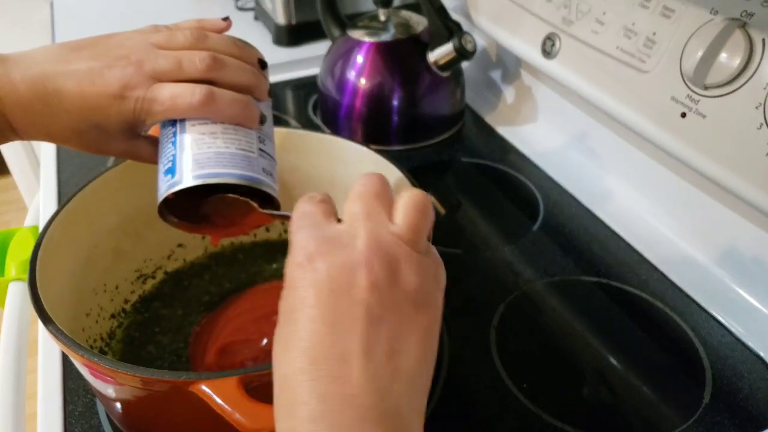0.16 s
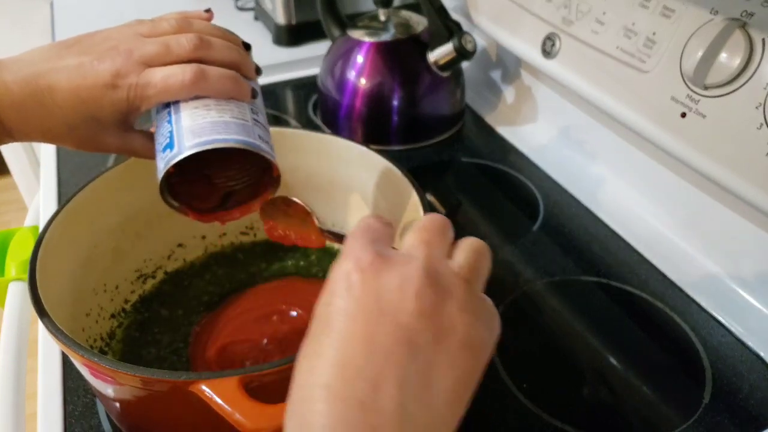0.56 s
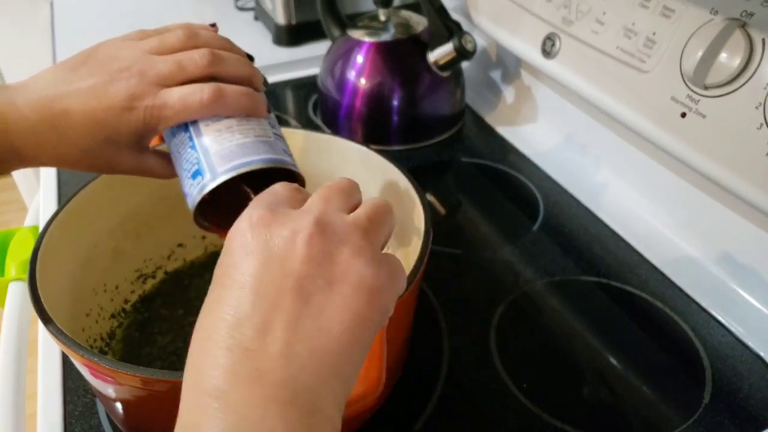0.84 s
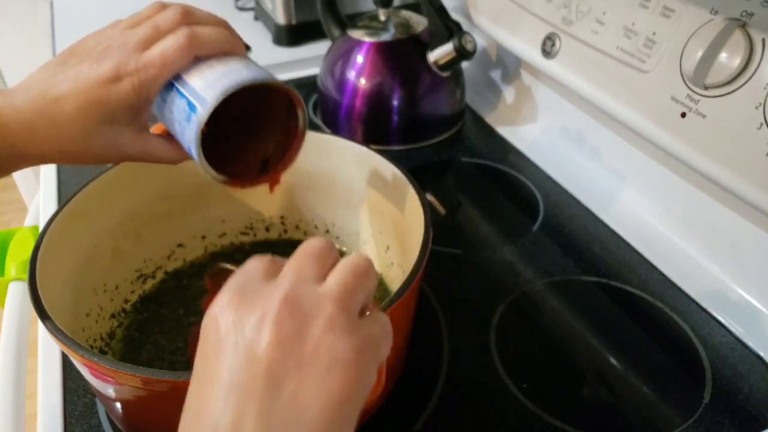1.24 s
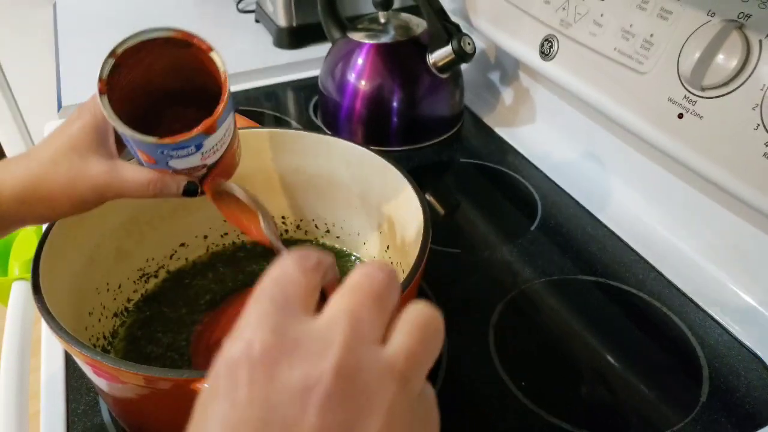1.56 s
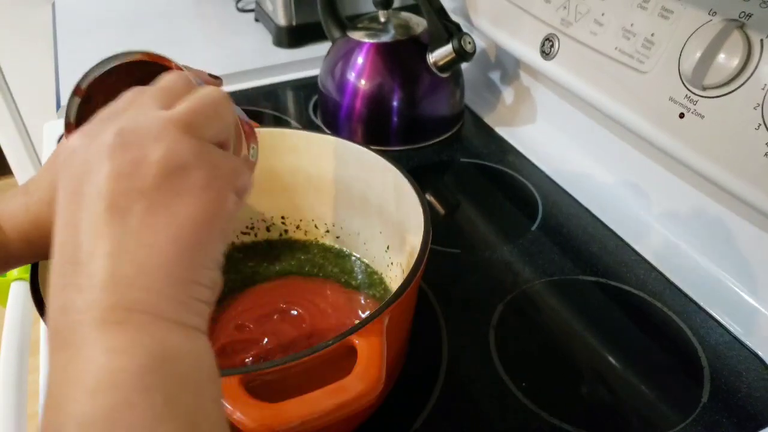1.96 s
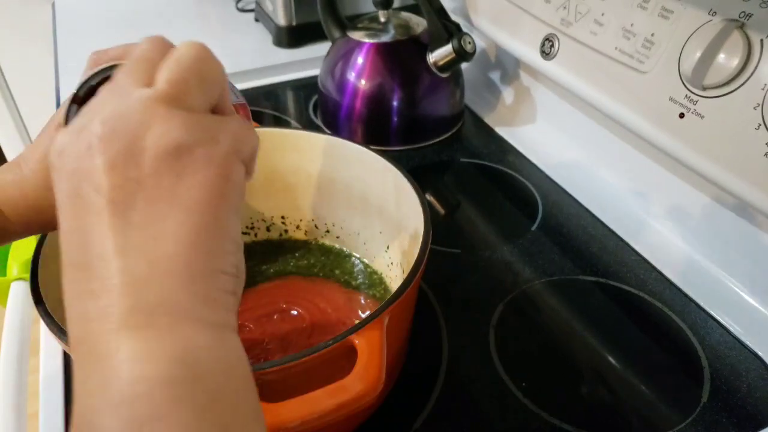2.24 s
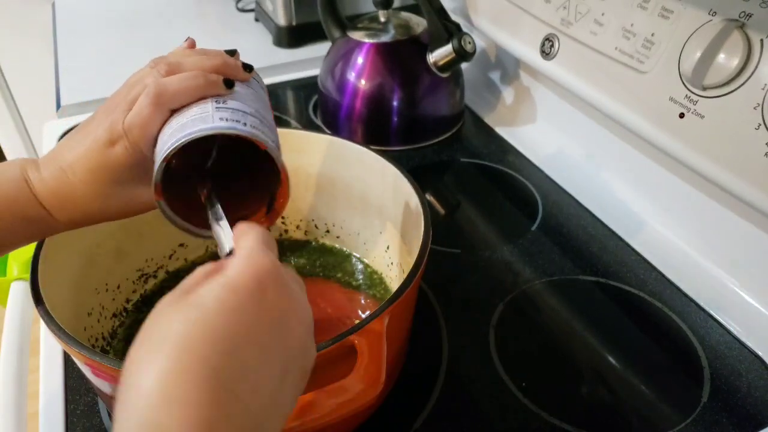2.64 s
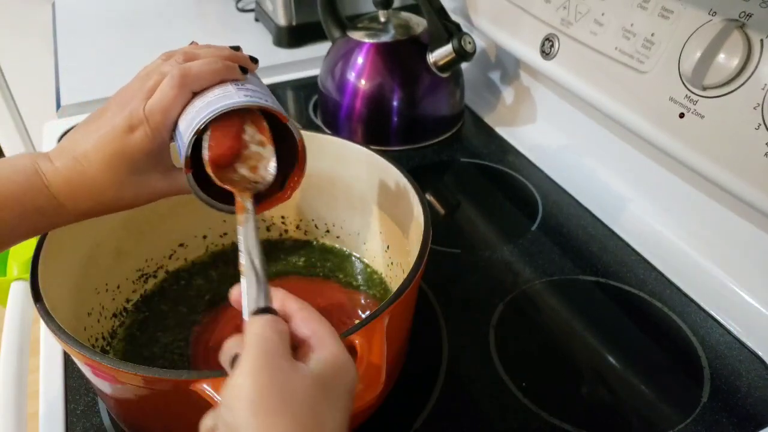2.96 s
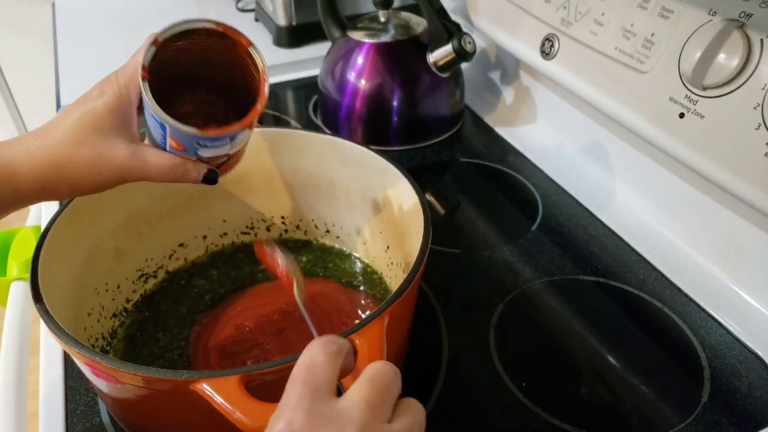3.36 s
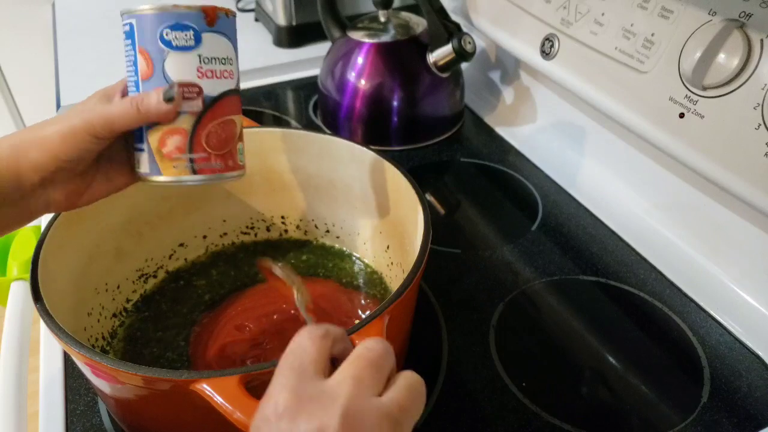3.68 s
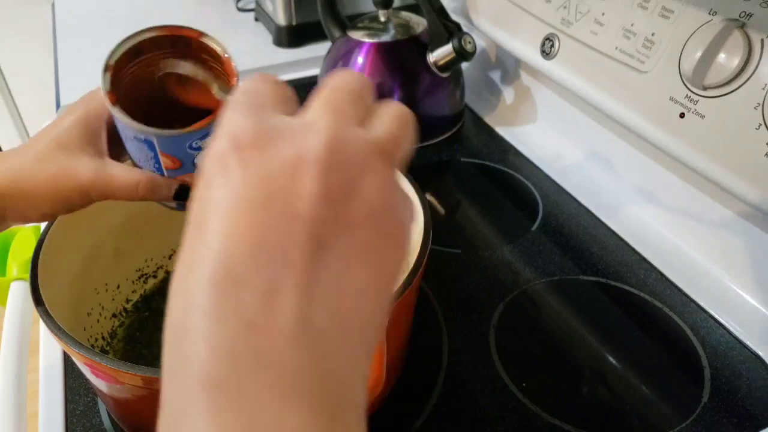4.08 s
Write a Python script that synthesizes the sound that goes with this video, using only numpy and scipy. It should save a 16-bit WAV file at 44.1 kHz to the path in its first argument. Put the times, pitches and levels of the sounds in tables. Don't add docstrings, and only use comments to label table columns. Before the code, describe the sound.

Over a quiet appliance hum and faint pot sizzle, a spoon taps a thin, hand-damped can, pauses, scrapes again, then clatters in a dense run of drags and sharp clacks. After a brief lull, two strong knocks on a cast-iron pot ring clear and bright with a low stove thud, followed by a tinny can strike. Close stereo microphones, small kitchen with a short reverberation.

```python
import sys
import numpy as np
from scipy import signal
from scipy.fft import rfft, irfft, next_fast_len
from scipy.io import wavfile
from scipy.ndimage import uniform_filter1d, map_coordinates

SR = 44100
rng = np.random.default_rng(int(sys.argv[2]) if len(sys.argv) > 2 else 0)


def undo_db(level):
    steps = np.asarray(level, float) / 20
    return 10 ** steps


def transcribe(u):
    v = np.clip(np.atleast_2d(u).T, -1, 1)
    q = np.round(v * 32767).astype(np.int16)
    wavfile.write(sys.argv[1], SR, q)


N = 185726

# [pitch_hz, likeness]
PORT_LIKENESS = [(60, 1), (200, 0.68), (600, 0.87), (1400, 0), (3000, 0), (15000, 0.063)]
# [pitch_hz, t60_s]
KITCHEN_DECAY = [(200, 0.33), (2000, 0.44), (6000, 0.23), (14000, 0.15)]
# [pitch_hz, level_db]
MIC_EDGE = [(15750, 0), (15950, -70)]

# [pitch_hz, density_db_per_hz]
HUM_COLOUR = [(13, -52), (22, -104), (43, 4), (107, -11.5), (141, -8.5), (271, -18), (349, -6.5),
              (390, -11), (459, 1.5), (685, -18), (836, -22), (950, -2), (1120, -44), (1470, -15),
              (1700, -50), (2210, -56), (3740, -120)]
# [pitch_hz, width_hz, level_db]
HUM_TONES = [(60.6, 1.5, 8), (99.9, 3.2, 5.5), (453, 81, -8), (959, 67, -9.5)]
# [pitch_hz, density_db_per_hz]
HISS_COLOUR = [(710, -16), (1200, -63), (1470, -1.5), (1930, -7.5), (2470, -1.5), (3100, -5.5),
               (4980, -5.5), (12200, -10), (15800, -9)]
HUM_DB, HISS_DB = -53.5, -60.5

# [start_s, length_s, wall_db, hollow_over_wall_db, rasp_over_wall_db]
DRAGS = [(.005, 0.03, -50.5, 7, -20), (0.178, .09, -65.5, 4, -12), (0.681, 0.17, -42, -9, -34),
         (0.757, 0.045, -49, -13, -34), (0.793, 0.053, -43, -11, -7.5), (1.002, 0.05, -60.5, 13, -4),
         (1.288, 0.18, -58, -20, -7), (1.953, 0.077, -39, 7, -5), (1.996, 0.041, -37, -4, -7),
         (2.054, 0.11, -43.5, -19, -7.5), (2.155, 0.057, -39, 3.5, -10.5), (2.238, 0.027, -55, 14, -12),
         (2.335, 0.047, -44, 5, -20), (2.385, 0.031, -43, 5, -10), (2.398, 0.035, -58.5, 25, -9),
         (2.453, 0.12, -49.5, 9, -7), (2.575, 0.055, -49, -11, -12), (2.682, 0.091, -45, 9, -5),
         (2.805, 0.16, -62, 21, 1), (2.942, 0.21, -54.5, 5, 0.5)]
# [start_s, length_s, wall_db, hollow_over_wall_db, rasp_over_wall_db]
SWEEPS = [(0.244, 0.028, -62.5, 24.5, 3), (0.363, 0.063, -49.5, 13, 2.5), (0.762, 0.11, -43, 8.5, -6),
          (1.001, 0.046, -56, 20, 6), (1.185, 0.043, -36, 6, -16), (2.632, 0.021, -52, 9, -0.5),
          (2.981, 0.066, -49, 17, -15), (3.042, 0.058, -43.5, 10, 2.5)]
LAND_S, SAG_DB_PER_S, SWELL_DB, LIFT_DB_PER_S = 0.0028, 77, 15.5, 612
HOLLOW_SAG = 0.36
# [start_s, most_excited_pitch_hz]
CONTACT = [(0, 2620), (.3, 3430), (.69, 3630), (.85, 4040), (1.05, 3050), (1.3, 3100), (1.95, 3640),
           (2.17, 3100), (2.42, 2850), (2.455, 1810), (2.54, 1900), (2.6, 2700), (2.69, 5050), (2.77, 4900),
           (2.82, 2940), (3.1, 3700)]
# [start_s, end_s, hollow_pitch_ratio, wall_db]
GRIPS = [
    (0, 1.7, 0.97, -10),
    (1.7, 2.62, 1.0, -7.5),
    (2.619, 3.4, 0.995, 1.5),
]
# [pitch_hz, width_hz, level_db]
GRIP_WALLS = [
    [(1873, 90, 8.5), (2320, 42, 6), (3000, 110, 4.5), (3624, 146, 4.5), (3970, 20, -11), (4280, 71, -9),
     (4660, 22, -16), (4900, 196, -1), (5500, 80, -3), (5930, 75, -21), (7050, 110, -9)],
    [(1840, 190, 2), (2230, 37, 5), (2443, 40, 1), (2830, 105, 0), (3100, 38, -20), (3420, 38, -5),
     (4430, 79, 6.5), (4640, 19, 5), (4600, 84, -5), (5000, 98, -9), (5900, 160, -19), (6290, 69, -16)],
    [(1976, 39, -1.5), (2330, 14, 6), (2340, 30, -8), (2850, 55, -9.5), (3450, 22, -21), (3900, 29, 2),
     (4200, 36, -2), (4530, 45, -8), (4670, 79, -4), (5250, 260, -12), (5700, 190, -28), (6850, 51, -8)],
]
# [pitch_hz, width_hz, level_db]
STROKE_HOLLOW = [(300, 60, -20), (475, 50, -18), (652, 28, 2), (1140, 60, -11), (1435, 40, -13)]
# [pitch_hz, width_hz, level_db]
HOLLOW_OVERTONE = [(1143, 48, -11)]
# [pitch_hz, density_db_per_hz]
SHELL_COLOUR = [(150, -53), (300, 9.5), (700, -16), (1300, -61), (2000, 2.5), (4300, 8), (6500, -11.5),
                (9000, -10)]
# [pitch_hz, density_db_per_hz]
RASP_COLOUR = [(2940, -20), (5000, 17.5), (5530, 11), (7070, 17.5), (8370, 14), (10300, 15.5), (12500, 22),
               (14500, 8), (15800, 18.5)]

# [start_s, peak_db, thump_over_peak_db, crack_over_peak_db]
STRIKES = [(0.682, -33, -1.5, 2.5), (1.152, -32, -6, -5), (2.0354, -17.5, -9.5, -1.5),
           (2.113, -24.5, -6.5, -10.5), (2.549, -30, -13, 1), (4.1853, -18, -5.5, -5.5),
           (0.0803, -22.5, -6, -6), (0.1312, -34, 3.5, -12.5), (0.1706, -31, -2, -23),
                 (2.3385, -32, -11.5, -11.5), (2.409, -34, -8, 1.5), (2.448, -32.5, -13, -5)]
# [pitch_hz, level_db, t60_s]
STRIKE_SPOTS = [
    [(670, -4, 0.1), (1117, 3, 0.052), (1818, -11, 0.3), (2930, -0.5, 0.074), (3100, -1, 0.068),
     (3630, 10.5, 0.05), (4160, 6, 0.04), (4550, -6, .018), (5238, -13, 0.08)],
    [(674.5, 2.5, 0.11), (1010, -8, 0.048), (1840, -8, 0.08), (2190, -7, 0.069), (2980, -9.5, 0.2),
     (3180, 4.5, 0.026), (3580, -11, 0.072), (4000, -10, 0.069), (4700, -16, .1)],
    [(456, -3.5, 0.039), (1214, 2.5, 0.061), (2213, -5, 0.1), (2263, -5, 0.082), (2430, -4.5, 0.069),
     (2960, -32, .1), (4400, 1, 0.024), (4610, 8, 0.019), (4670, -20, 0.14), (6100, -25, 0.042),
     (6990, -4.5, 0.029)],
    [(648, -1.5, 0.12), (1210, -14, 0.052), (1853, -0.5, 0.054), (3000, -20, 0.02), (3500, -8, 0.059),
     (3630, -8.5, 0.067), (4150, -15, .09), (6080, -8, 0.035), (6370, -1, 0.046)],
    [(460, -1, 0.05), (1964, -2.5, 0.084), (2440, -9, .067), (2900, -14, 0.24), (3510, -3, 0.063),
     (4140, -2.5, 0.04), (4600, -18, 0.035), (5400, -14, 0.055), (6250, 7.5, 0.019), (7100, -13, 0.028)],
    [(510, -14, 0.043), (655, 2, 0.089), (1140, -4.5, 0.068), (1900, -11, 0.032), (2240, -7, 0.084),
     (2360, -9.5, .1), (2940, 0, 0.21), (3616, -4, 0.081), (4370, -3, 0.055), (4540, 5, 0.026),
     (5240, -16, 0.063), (7160, -15.5, 0.083)],
]
# [pitch_hz, level_db, t60_s]
MORE_STRIKE_SPOTS = [
    [(472, -5.5, 0.069), (608, -8, 0.2), (925, 1.5, 0.047), (1720, -9.5, 0.044), (2600, -10.5, 0.064),
     (2850, -14, 0.1), (3620, 2, 0.039), (4360, -19, 0.052), (5320, -19, 0.042)],
    [(484, 8, 0.017), (790, -8, 0.016), (3526, -9, 0.063)],
    [(466, 1, 0.067), (608, 1.5, 0.069), (902, 0.5, 0.049)],
    [(645, 1, 0.12), (1130, -3, 0.033), (2230, -18.5, 0.24), (4250, -7, .06), (4700, 1, 0.042)],
    [(656, -4, 0.15), (1850, -4, 0.044), (4200, -10, 0.035), (4720, -12, 0.054)],
    [(490, -2, 0.053), (655, -2, 0.1), (1860, -5, 0.12), (1960, -2.5, 0.091), (3570, -16, .1)],
]
# [start_s, peak_db, pitch_hz]
JOLTS = [(0.132, -38, 297), (0.169, -55, 295), (0.684, -43, 430), (0.793, -50, 310), (0.872, -45, 283),
         (2.032, -33.5, 281), (2.036, -42.5, 144), (2.162, -46, 148), (2.412, -40.5, 164),
         (2.955, -46, 290)]
# [start_s, peak_db, hollow_db, hollow_hz, ring_hz]
BUMPS = [(0.2164, -52, 4.5, 640, 2960), (0.799, -33.5, -4.5, 666, 3630), (2.2364, -41.5, -5, 637, 2900),
         (2.5331, -33, -8, 463, 1904)]
# [start_s, peak_db, hollow_db, hollow_hz, ring_hz]
ROLLS = [(0.405, -42.5, -1, 608, 2300)]
# [start_s, peak_db, hollow_db, hollow_hz, ring_hz]
TAPS = [(0.8744, -53, 6.5, 518, 1840), (1.0012, -52.5, 11.5, 664, 3970), (1.954, -40, -12.5, 650, 4200),
        (2.6903, -37.5, -13.5, 445, 3450), (2.9552, -43.5, -4.5, 610, 4780)]
# [start_s, peak_db, hollow_db, hollow_hz, ring_hz]
TICKS = [(1.9994, -40, -4, 634, 3970)]
# [pitch_hz, width_hz, level_db]
HOLLOW = [(330, 20, -46), (410, 30, -14), (639, 47, -13.5), (964, 21.5, -1.5), (1040, 140, -2.5),
          (1360, 23, -52)]
# [pitch_hz, width_hz, level_db]
WALL = [(1750, 68, -21), (1960, 53, -3), (2265, 49, -9), (2470, 39, -18), (2830, 42, -4), (3450, 115, -18),
        (3740, 40, 0), (3970, 38, -8), (4270, 27, -22), (4360, 130, -11), (4890, 180, -18), (5440, 110, -6),
        (6300, 15, -7), (6400, 130, -24)]
# [pitch_hz, density_db_per_hz]
CRACK_COLOUR = [(120, -82), (200, -7), (1170, -2.5), (1480, -11.5), (1780, -6.5), (2200, -8), (3890, -2),
                (4510, -1), (5630, -4), (14200, -10.5), (16400, -14)]
# [pitch_hz, density_db_per_hz]
THUMP_COLOUR = [(60, -34), (150, -1), (300, -0.5), (600, 8.5), (1200, 0), (1600, -73), (3000, -56)]
# [start_s, peak_db]
SPITS = [(0.279, -38), (1.381, -35.5), (3.292, -39), (4.02, -49)]
# [start_s, length_s, pitch_hz, level_db]
SINGS = [(0.703, 0.16, 3630, -53), (.7, 0.13, 1850, -52.5), (.8, 0.085, 2980, -55),
         (1.984, 0.033, 4270, -40.5), (2.515, 0.033, 1900, -44), (2.647, 0.14, 644, -51),
         (2.809, .13, 644.4, -50), (2.94, 0.038, 651, -43.5), (3.012, 0.099, 650.5, -46),
         (2.164, 0.034, 655, -48.5)]
# [start_s, peak_db]
CHATTER = [(1.2125, -40.5), (1.2195, -35.5), (1.2255, -35.5), (1.233, -41), (1.2405, -52)]
# [pitch_hz, level_db, t60_s]
DAMPED = [(674, 2.5, 0.05), (1142, 7, 0.032), (1520, -3, 0.03), (1920, -19, .03), (3050, -4.5, 0.079),
          (3640, -1, 0.051), (4700, -18, 0.027)]
# [start_s, wall_db, hollow_over_wall_db, hollow_hz, ring_hz]
BLOWS = [(2.164, -29, 2, 725, 2330), (2.17, -45, -11, 714, 4530)]
# [pitch_hz, width_hz, level_db]
CAN = [(460, 61, -8), (634, 11, -23), (926, 26, -8), (1157, 40, -4), (1854, 90, -15), (2256, 71, -1),
       (2420, 32, -11), (2900, 16, -10), (3570, 66, 3), (4060, 52, -2.5), (4780, 23, -7), (5330, 22, -16),
       (5930, 84, -13), (7240, 55, -4.5)]
HOLLOW_TOP_HZ = 1400

# [start_s, peak_db, thud_db, edge_db, low_ring_db]
KNOCKS = [
    (3.514, -10.5, -22.5, -2.5, -2.5),
    (3.7181, -8, -23, -6.5, -1),
]
IRON_HZ = [481, 589, 877, 1106, 1771, 2268, 2304, 2756, 2767, 2781, 2798, 3119, 3229, 3333, 3506, 3560,
           3741, 4061, 4590, 4800, 5133, 5258, 5727, 6186, 6215, 6238, 6727, 6894, 7913]
# [level_db, t60_s]
IRON = [(-23.5, 1.5), (-14.5, .75), (-41, 1.5), (-34.5, 0.59), (-16, 0.25), (-13, 0.55), (-21, 0.39),
        (-17, 0.42), (-4, 0.27), (-8, 0.16), (-24, 0.14), (-19, .2), (-9, 0.15), (-16, 0.33), (-14, 0.28),
        (-17, 0.18), (-6, 0.055), (-13, 0.15), (-18, 0.26), (-25, 0.2), (-24, .3), (-28, .3), (-30, 0.13),
        (-6, .09), (7.5, 0.07), (-11, .1), (-16, 0.15), (-14.5, 0.25), (-30, 0.17)]
# (pitch_hz, level_db, t60_s, rise_s)
SWELL = (2062, -10, .56, .06)
# [pitch_hz, level_db, t60_s]
SPOON = [
    [(2330, -9, 0.03), (3100, -9, 0.12), (3200, -11, 0.024), (3396, -2, 0.059), (3850, 4.5, 0.038),
     (4770, -5, 0.092), (5450, 3, .05), (6230, 4.5, 0.082), (6900, -8, 0.072)],
    [(2590, -6, 0.055), (3320, -8, 0.058), (3550, -7, 0.046), (4120, -7.5, 0.073), (4240, -22, 0.087),
     (5180, -7, 0.059), (6750, -5.5, 0.06)],
]
# [pitch_hz, level_db, t60_s]
THUD = [(153, -7, .5), (165, -4, .3), (172, 4, .08), (181, -4, .55), (204, -7, .95), (240, -24, .4),
        (57.45, -16, 1), (485, 18.5, .029), (310, 2, .04), (666, 1.5, .073)]
# [pitch_hz, density_db_per_hz]
CLANK_COLOUR = [(410, -18), (800, -12.5), (1930, -11), (2730, -7.5), (3690, 9), (4330, -19), (4680, 6),
                (5860, -1.5), (6340, -2), (7730, -11), (12900, -7), (15800, -21), (16400, -40)]
# [pitch_hz, density_db_per_hz]
STOVE_COLOUR = [(40, -40), (60, 10), (110, 1), (160, 11), (215, 14.5), (300, 2), (480, -3), (700, -7),
                (1200, -64)]


def unit(x):
    return x / np.sqrt(np.mean(x ** 2) + 1e-20)


def along(points, hz):
    f, v = np.transpose(points)
    return np.interp(np.log(hz + 1), np.log(f + 1), v)


def wobble(rate, size=N):
    knots = rng.standard_normal(int(size * rate / SR) + 4)
    return map_coordinates(knots, [np.arange(size) * rate / SR])


def filtered(x, response):
    m = next_fast_len(x.shape[-1] + 8192)
    spectrum = rfft(x, m) * response(np.fft.rfftfreq(m, 1 / SR))
    return irfft(spectrum, m)[..., :x.shape[-1]]


def ports(hz, scatter=1.64):
    turn = rng.choice([-1, 1], np.shape(hz)) * rng.uniform(0.51, 1.99, np.shape(hz))
    lead = np.pi * hz * 7 / SR * np.exp(-(hz / 1800) ** 2)
    beam = scatter * np.minimum(hz / 2200, 1) ** 2 * turn / 2
    return np.array([lead + beam, -lead - beam])


def mode_ports(modes, scatter=1.64):
    return ports(np.transpose(modes)[0], scatter)


def rush(spectrum, size=N, patchy_db=0):
    z = signal.stft(rng.standard_normal((2, size + 512)), nperseg=512)[2]
    field = uniform_filter1d(rng.standard_normal(z.shape[1:]), size=6, axis=0)
    field = uniform_filter1d(field, size=8, axis=1)
    pair = signal.istft(z * undo_db(patchy_db * unit(field)), nperseg=512)[1][:, :size]

    def mid_side(hz):
        turn = np.arccos(np.clip(along(PORT_LIKENESS, hz), -1, 1)) / 2
        return undo_db(along(spectrum, hz)) * [np.cos(turn), np.sin(turn)]

    mid, side = filtered(pair, mid_side)
    return unit(np.array([mid + side, mid - side]))


def resonate(x, peaks):
    turns = np.exp(1j * mode_ports(peaks)).T[:, :, None]

    def response(f):
        total = 0
        for (hz, width, db), turn in zip(peaks, turns):
            total = total + turn * undo_db(db) * 1j * f * width / (hz * hz - f * f + 1j * f * width)
        return total

    return filtered(x, response)


def ring(modes, t, spread_db, phase, rise=0.00095):
    hz, db, t60 = np.transpose(modes)[:, :, None]
    size = undo_db(db + spread_db * rng.standard_normal(hz.shape) - 60 * t / t60)
    waves = size * np.sin(2 * np.pi * hz * t + phase[:, :, None])
    return np.sum(waves, axis=1) * (1 - np.exp(-t / rise))


def add(out, s, piece):
    room = out[:, round(s * SR):][:, :piece.shape[1]]
    room += piece[:, :room.shape[1]]


def floor():
    hum = undo_db(HUM_DB - 3.0) * rush(HUM_COLOUR, patchy_db=3.5)
    tones = undo_db(HUM_DB - 7.5) * unit(resonate(rng.standard_normal(N), HUM_TONES))
    flutter_db = 0.3 * wobble(3) + 0.5 * wobble(150)
    sizzle = undo_db(HISS_DB + flutter_db) * rush(HISS_COLOUR)
    return hum + tones + sizzle


def contact():
    t, level = np.arange(SR // 3) / SR, np.zeros((3, N))
    strokes = [(row, 0, SAG_DB_PER_S * row[1]) for row in DRAGS]
    strokes += [(row, SWELL_DB, 0) for row in SWEEPS]
    for (s, length, db, hollow_db, rasp_db), swell_db, sag_db in strokes:
        done = np.clip(t / length, 0, 1)
        sag = sag_db * done * np.array([[HOLLOW_SAG], [1], [1]])
        lift = LIFT_DB_PER_S * np.maximum(t - length, 0)
        shape_db = -swell_db * (1 - done) - sag - lift
        peaks = undo_db([[db + hollow_db], [db], [db + rasp_db]])
        add(level, s, np.clip(t / LAND_S, 0, 1) * undo_db(shape_db) * peaks)
    focus_hz = np.interp(np.arange(N) / SR, *np.transpose(CONTACT))
    return level, focus_hz


def slips(rate, size_db):
    happens = rng.random(N) < rate / SR
    return happens * undo_db(size_db * rng.exponential(size=N)) * rng.choice([-1, 1], N)


def scrape():
    (hollow_level, wall_level, rasp_level), focus_hz = contact()
    judder = undo_db(1.5 * wobble(45))
    push = hollow_level * unit(undo_db(3.0 * wobble(28.55)) * slips(2500, 2.5))
    drive = wall_level * unit(judder * slips(5000, 1.2))
    hollow, wall = np.zeros((2, N)), resonate(drive, HOLLOW_OVERTONE)
    for (start, end, ratio, wall_db), modes in zip(GRIPS, GRIP_WALLS):
        held = slice(round(start * SR), round(end * SR))
        tuned = [(hz * ratio, width, db) for hz, width, db in STROKE_HOLLOW]
        add(hollow, start, resonate(push[held], tuned))
        for mode in modes:
            near = 0.35 + np.exp(-(np.log(mode[0] / (focus_hz + 1)) / 0.3) ** 2)
            add(wall, start, undo_db(wall_db) * resonate((drive * near)[held], [mode]))
    grit = undo_db(1.4 * wobble(240)) * judder ** 1.45
    bed_level = undo_db(-7.0) * wall_level + undo_db(-25.5) * hollow_level
    bed = bed_level * unit(grit * rush(SHELL_COLOUR, patchy_db=3))
    rasp = rasp_level * unit(grit * rush(RASP_COLOUR, patchy_db=3.0))
    return undo_db(11.5) * hollow + undo_db(18.0) * wall + bed + undo_db(2.0) * rasp


def strikes():
    out, t = np.zeros((2, N)), np.arange(SR // 4) / SR
    rise = 1 - np.exp(-t / 0.00044)
    hits = zip(STRIKES, STRIKE_SPOTS + MORE_STRIKE_SPOTS)
    for (s, db, thump_db, crack_db), modes in hits:
        shell = ring(modes, t, 0, mode_ports(modes, 1.36))
        thump = undo_db(thump_db - 60 * t / 0.058) * rise * rush(THUMP_COLOUR, size=len(t))
        crack_fall = undo_db(-60 * t / 0.049) + undo_db(-6 - 60 * t / 0.043)
        crack = undo_db(crack_db) * crack_fall * rise * rush(CRACK_COLOUR, size=len(t))
        add(out, s, undo_db(db) * (shell + thump + crack))
    return out


def jolts():
    out, t = np.zeros((2, N)), np.arange(SR // 8) / SR
    for s, db, hz in JOLTS:
        add(out, s, ring([(hz, db + 7.5, 0.06)], t, 0, ports(np.array([hz])), 0.0074))
    return out


def taps(touches, rise, crack_db, thump_db):
    out, t = np.zeros((2, N)), np.arange(SR // 4) / SR
    onset = 1 - np.exp(-t / rise)
    for s, db, hollow_db, hollow_hz, ring_hz in touches:
        hollow = [(hollow_hz, 0, 0.07)] + [(hz, g - 7, 1.46 / width) for hz, width, g in HOLLOW]
        wall = [(ring_hz, 0, 0.06)] + [(hz, g - 9, 2.5 / width) for hz, width, g in WALL]
        low = ring(hollow, t, 1.8, mode_ports(hollow), rise)
        low += undo_db(thump_db - 60 * t / 0.13) * onset * rush(THUMP_COLOUR, size=len(t))
        crack = undo_db(crack_db - 60 * t / 0.027) * onset * rush(CRACK_COLOUR, size=len(t))
        high = ring(wall, t, 3.0, mode_ports(wall), rise)
        add(out, s, undo_db(db) * (undo_db(hollow_db + 6.5) * low + high + crack))
    return out


def spits():
    out, t = np.zeros((2, N)), np.arange(SR // 20) / SR
    colour = [(3000, -24), (6000, -9), (12000, -5), (15800, -12)]  # pitch_hz, density_db_per_hz
    for s, db in SPITS:
        add(out, s, undo_db(db - 12.0 - 60 * t / 0.034) * rush(colour, size=len(t)))
    return out


def sings():
    out, t = np.zeros((2, N)), np.arange(SR // 4) / SR
    for s, length, hz, db in SINGS:
        shape_db = 3.3 * wobble(60, size=len(t)) - 900 * np.maximum(t - length, 0)
        wander = 1.25 * wobble(71, size=len(t))
        turn = 2 * np.pi * hz * t + wander + ports(np.array([hz]), 0.74)
        add(out, s, undo_db(db + shape_db) * (1 - np.exp(-t / 0.0096)) * np.sin(turn))
    return out


def chatter():
    out, t = np.zeros((2, N)), np.arange(SR // 8) / SR
    for s, db in CHATTER:
        noise = undo_db(-15.0) * rush(THUMP_COLOUR, size=len(t)) + undo_db(-7) * rush(CRACK_COLOUR, size=len(t))
        grit = undo_db(-60 * t / 0.047) * noise * (1 - np.exp(-t / 0.0022))
        modes = ring(DAMPED, t, 1.5, mode_ports(DAMPED, 1.0), 0.0021)
        add(out, s, undo_db(db) * (modes + grit))
    return out


def blows():
    out, t = np.zeros((2, N)), np.arange(SR // 4) / SR
    rise = 1 - np.exp(-t / 0.00052)
    widths = [mode[:2] for mode in CAN]
    for s, db, hollow_db, hollow_hz, ring_hz in BLOWS:
        rest = []
        for hz, width, g in CAN:
            if min(abs(hz / ring_hz - 1), abs(hz / hollow_hz - 1)) > 1 / 20:
                rest.append((hz, g + hollow_db * (hz < HOLLOW_TOP_HZ), 2.0 / width))
        favoured = [(hollow_hz, hollow_db), (ring_hz, 2)]
        best = [(hz, g, 2.4 / along(widths, hz)) for hz, g in favoured]
        shell = ring(rest, t, 5.8, mode_ports(rest, 0.59)) + ring(best, t, 0, mode_ports(best, 0.85))
        thump = undo_db(hollow_db - 5.0 - 60 * t / 0.031) * rise * rush(THUMP_COLOUR, size=len(t))
        crack = undo_db(-2.0 - 60 * t / 0.017) * rise * rush(CRACK_COLOUR, size=len(t))
        add(out, s, undo_db(db) * (undo_db(-7.5) * shell + thump + crack))
    return out


def knocks():
    out, t = np.zeros((2, N)), np.arange(SR * 3 // 4) / SR
    rise = 1 - np.exp(-(t / 0.00094) ** 2)
    iron = [(hz, db, t60) for hz, (db, t60) in zip(IRON_HZ, IRON)]
    iron_phase, thud_phase = mode_ports(iron, 0.95), mode_ports(THUD)
    for (s, db, thud_db, edge_db, low_db), spoon in zip(KNOCKS, SPOON):
        clank_fall = undo_db(-60 * t / 0.044) + undo_db(-27.0 - 60 * t / 0.5)
        clank = rush(CLANK_COLOUR, size=len(t), patchy_db=2.5) * clank_fall * rise
        thud = ring(THUD, t, 2.3, thud_phase, 0.0027)
        thud += undo_db(-14.5 - 60 * t / 1.33) * rise * rush(STOVE_COLOUR, size=len(t))
        struck = [(hz, g + low_db * (hz < 2500), t60) for hz, g, t60 in iron]
        pot = ring(struck, t, 0.14, iron_phase, 0.0072)
        pot += undo_db(2 * low_db) * ring([SWELL[:3]], t, 0, iron_phase[:, 5:6], SWELL[3])
        steel = ring(spoon, t, 0, mode_ports(spoon, 1.1), 0.0031)
        knock = undo_db(-11.0) * pot + undo_db(thud_db + 1.5) * thud
        knock += undo_db(edge_db + 3.0) * clank + undo_db(-7.0) * steel
        add(out, s - 0.001, undo_db(db) * knock)
    return out


def kitchen(x):
    hz, t, z = signal.stft(rush([(100, 0)], size=SR // 2), SR, nperseg=256)
    fall = undo_db(-60 * t / along(KITCHEN_DECAY, hz)[:, None])
    tail = signal.istft(z * fall, SR, nperseg=256)[1]
    late = np.pad(x, ((0, 0), (250, 0)))
    return signal.fftconvolve(late, tail / np.linalg.norm(tail[0]), axes=1)[:, :N]


def scene():
    pot = knocks()
    pot += undo_db(-11) * kitchen(pot)
    can = blows() + strikes() + scrape()
    can += taps(TICKS, rise=0.00052, crack_db=8.8, thump_db=0.5)
    can += taps(TAPS, rise=0.001, crack_db=-1.5, thump_db=-12.0)
    can += taps(BUMPS, rise=0.0022, crack_db=-3, thump_db=-15.5)
    can += chatter()
    can += taps(ROLLS, rise=0.0074, crack_db=-25, thump_db=-25)
    can += jolts() + spits() + sings()
    return pot + can + undo_db(-12.0) * kitchen(can) + floor()


def roll_off(x):
    return signal.sosfilt(signal.butter(12, 16830, fs=SR, output="sos"), x)


def record(dry):
    mix = filtered(dry, lambda hz: undo_db(along(MIC_EDGE, hz)))
    return roll_off(mix)


dry = scene()
out = record(dry)
transcribe(out)
```